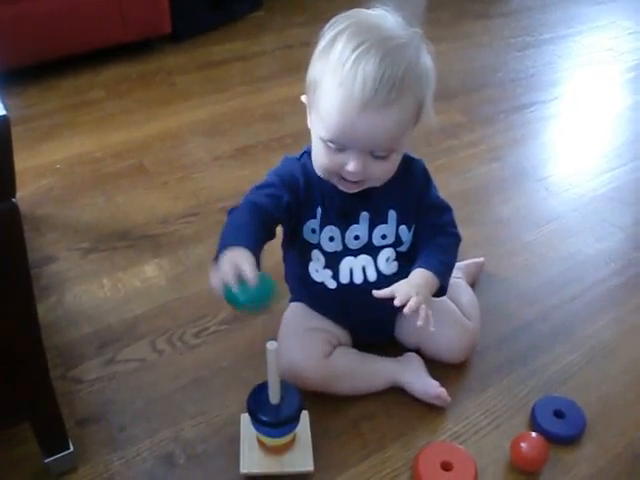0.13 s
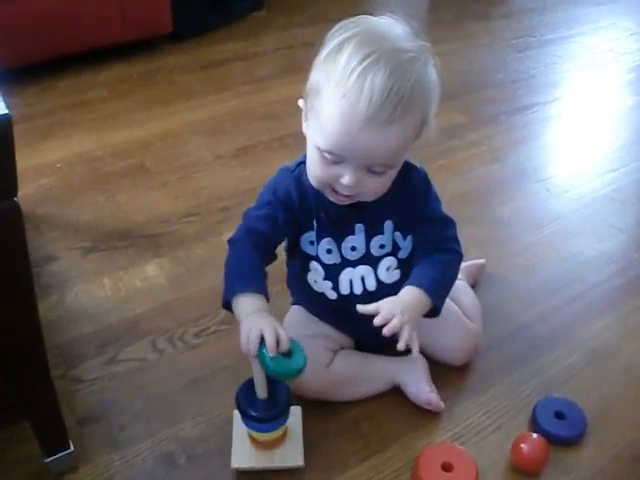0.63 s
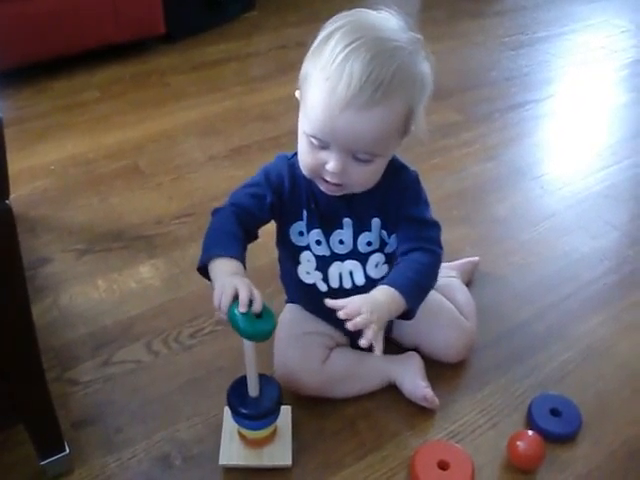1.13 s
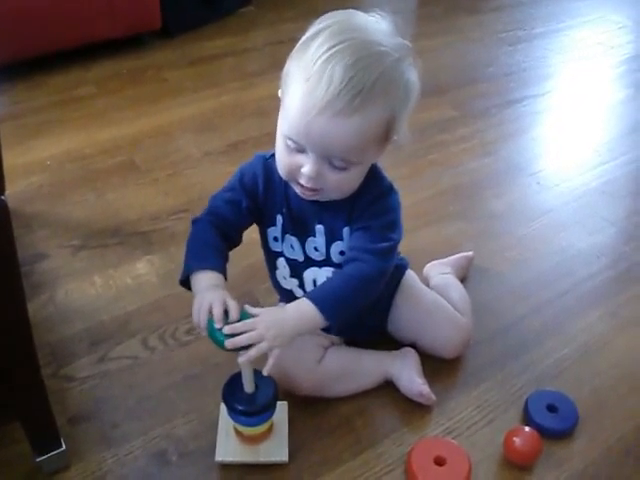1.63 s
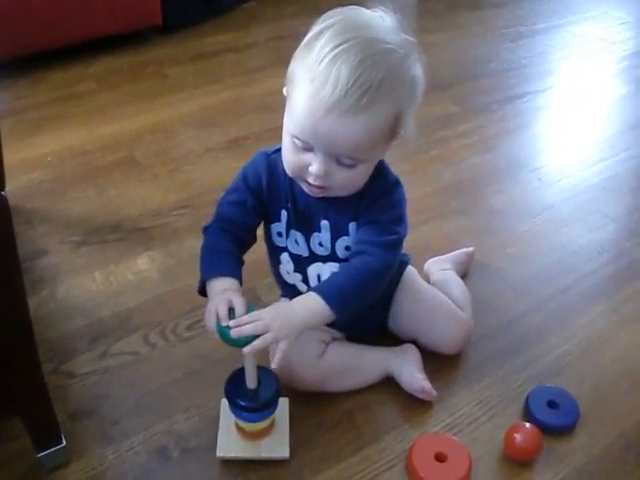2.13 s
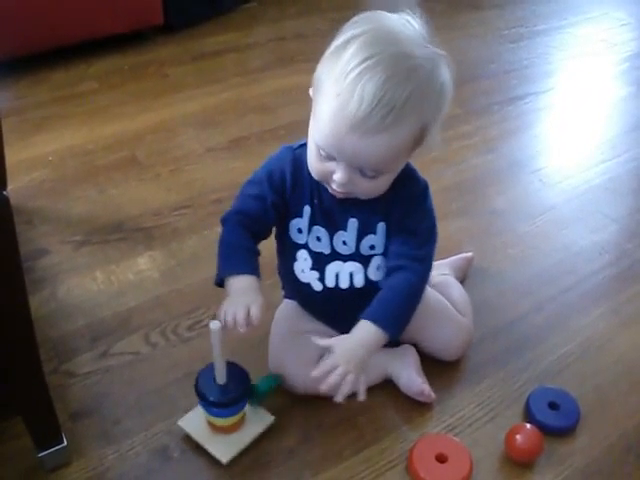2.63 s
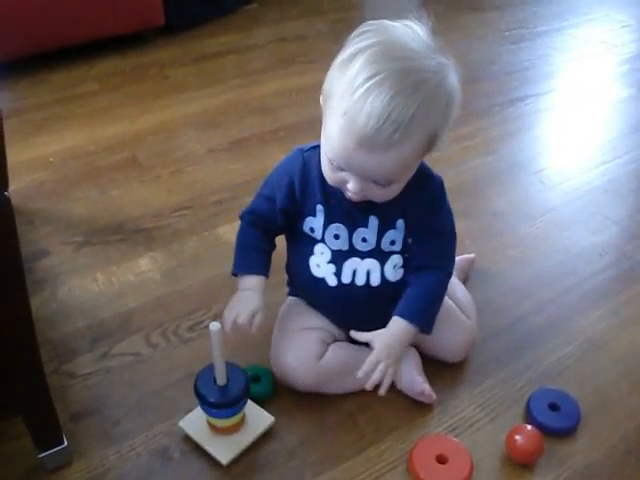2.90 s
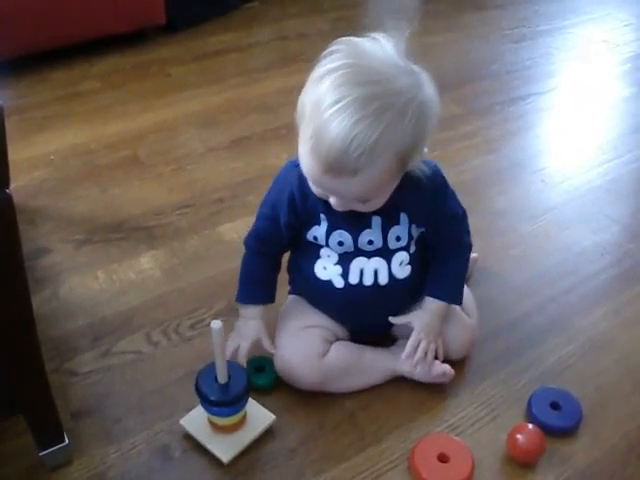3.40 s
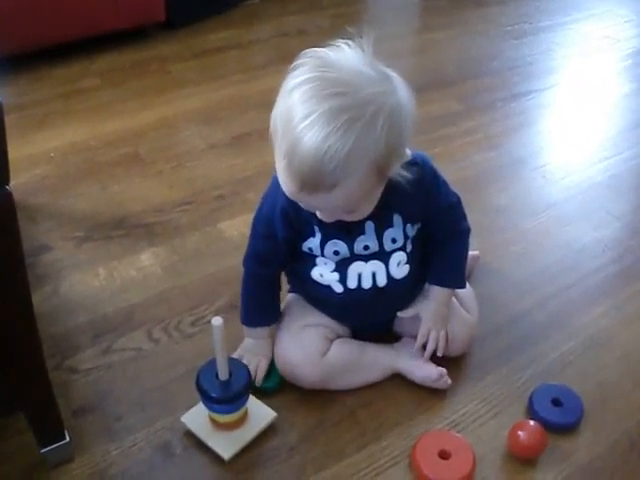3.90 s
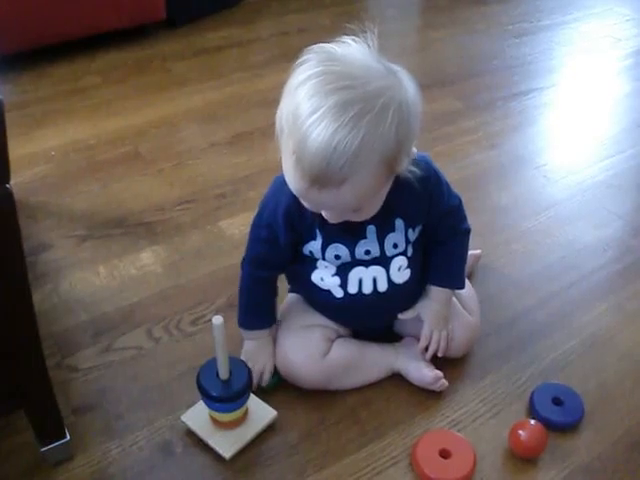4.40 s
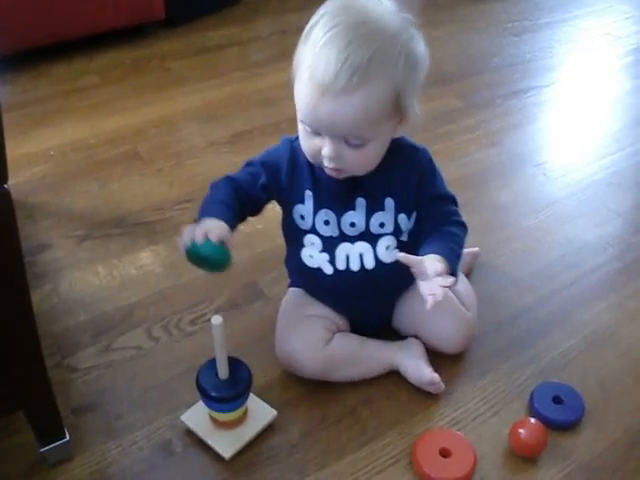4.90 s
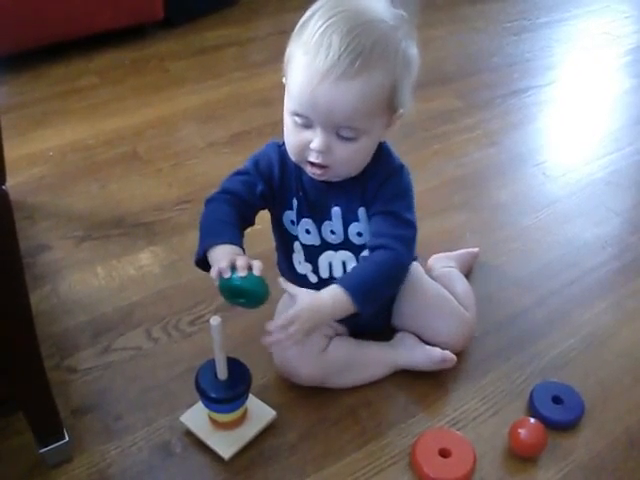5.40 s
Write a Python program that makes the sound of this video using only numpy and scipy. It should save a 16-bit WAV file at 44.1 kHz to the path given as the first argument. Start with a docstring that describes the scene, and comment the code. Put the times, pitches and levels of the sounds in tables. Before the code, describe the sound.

A wooden toy ring clatters sharply off a stacking peg, bounces and wobbles on a hard floor, then taps once more in a quiet room.

```python
"""A faint wavering hum, a thin whine and hiss run throughout: a small echoing room, one microphone.
A wooden toy ring is knocked against the peg of a stacking toy and scrapes off it: wooden parts ring as dying
sines, rubbing is a train of random slips. The ring drops on a hard board floor, bounces, wobbles on its rim
and settles, then is dragged, taps the floor faintly and lands once more. Wall echoes reach the microphone
5.5 to 19 ms behind the direct sound, with a short tail; the hardest blows overload it."""
import sys
import numpy as np
from scipy import signal
from scipy.io import wavfile
from scipy.ndimage import uniform_filter1d

SR = 44100
rng = np.random.default_rng(int(sys.argv[2]) if len(sys.argv) > 2 else 0)


def gain_from_db(level_db):
    """Convert decibel levels to linear amplitude factors (20 dB per decade)."""
    decades = np.asarray(level_db, float) / 20
    return 10 ** decades


def file_out(sig):
    """Save sig as 16-bit WAV at sys.argv[1]."""
    # one column per channel
    cols = np.atleast_2d(sig).T
    # limit, then scale
    lim = np.clip(cols, -1, 1)
    pcm = np.round(lim * 32767).astype(np.int16)
    wavfile.write(sys.argv[1], SR, pcm)


N = 243873

# Spectrum of the room and microphone noise: (frequency [Hz], relative density [dB per Hz])
HISS_SPECTRUM = [(12, -34.5), (25, -17), (64, -3), (120, -13.5), (250, -12), (500, -15), (1000, -18.5),
                 (1700, -20.5), (5960, -28), (8000, -33.5), (14400, -42), (15700, -45.5), (18100, -63.5),
                 (19500, -85)]
# Low hum: (time [s], frequency [Hz], level [dB], octave level [dB])
HUM = [(0, 97.5, -65, -60), (.25, 94.7, -62.5, -57.5), (.6, 93.7, -55.5, -71.5), (1.3, 94.5, -53.5, -58.5),
       (1.799, 94.7, -55, -82), (2.2, 95, -59, -71), (2.8, 94.24, -61, -84), (3.3, 92.9, -57, -61),
       (4, 91.76, -62.5, -66.5), (4.6, 91.7, -62, -65.5), (5.53, 90.1, -67, -77.5)]
# High whine: (frequency [Hz], level [dB])
WHINE = [(15488, -86.5)]
# A lower tone that rises: (time [s], frequency [Hz], level [dB])
DRONE = [(4.2, 73, -57.5), (4.599, 73.8, -64.5), (5.07, 77.6, -60.5), (5.53, 80.1, -65.5)]

# The base rocks against the floor: (time [s], level [dB])
THUDS = [(0.229, -26), (1.295, -29.5), (2.165, -34.5), (2.239, -27), (2.278, -15), (2.313, -15.5),
         (2.34, -15.5)]
# The ring meets the toy: (time [s], blow on the stacked rings [dB], peg relative to them [dB],
# favoured frequency [Hz], focus [dB per octave squared, below 0 counts as 0])
KNOCKS = [(1.295, -23, 6, 3302, 2.2), (2.158, -55, 12, 2000, -5), (2.237, -49, 10, 2555, -3),
          (2.248, -38, 11, 2520, -0.7), (2.27, -26, -13, 2500, 6), (2.276, -11, -3, 2900, 9),
          (2.281, -9.5, -7, 3300, 7), (2.295, 1.5, -22.5, 5800, 4), (2.295, -22, -26, 6200, 15.5),
          (2.304, -7, -39, 4330, 13), (2.313, -14, -11, 4000, 8), (2.339, 3.5, -27.5, 7000, 1),
          (2.340, 0.5, -14.5, 4340, -17.5), (2.379, -12.5, -27.5, 6050, 4), (2.489, -36, 8.5, 1993, 6.5),
          (2.4991, 7.5, -21, 3760, 10.5), (2.538, -26, 8, 7000, 5.5), (2.717, -1, -21, 3600, 22.5)]
# Wood rubs on wood as the ring leaves the peg: (time [s], level [dB])
SCRAPE = [(2.23, -49.5), (2.276, -15), (2.302, -20), (2.335, -33.5)]
# The ring lands on the floor: (time [s], blow [dB], boards relative to the ring [dB],
# favoured frequency [Hz], focus [dB per octave squared, below 0 counts as 0])
BOUNCES = [(2.661, 3, -15, 2050, 2.5), (2.773, 3, -20, 2390, -6.3), (2.843, 1.8, -24, 2270, 14.5),
           (2.876, 9.5, -48, 4550, 6), (3.101, 1.5, -17.5, 2200, 0), (3.143, -3, -11, 2200, 11.5),
           (3.172, -3.5, -21, 2200, 21), (3.741, -37.5, 0.5, 1820, 7), (4.532, -14.5, -10.5, 2223, -2.5),
           (4.5375, -26.5, 8.5, 1600, 5)]
# The tilted ring taps the floor with its rim: (time [s], level [dB])
RIM_TAPS = [(2.68, -15.5), (2.786, -16.5), (2.889, -2), (2.908, -16), (2.929, -13), (2.945, -9.5),
            (2.953, -19.5), (2.959, -7.5), (2.967, -8), (2.986, -16), (2.993, -14), (3, -20),
            (3.037, -26.5), (3.042, -2.5), (3.056, -18), (4.184, -45.5), (4.35, -42.5)]
# The ring rolls on its rim: (time [s], level [dB])
ROLL = [(2.87, -34), (3.014, -31.5), (3.03, -29.5), (3.041, -15), (3.05, -29.5), (3.075, -22)]
# The ring is dragged: (time [s], level [dB])
DRAG = [(3.69, -45), (3.735, -60.5), (3.745, -44.5), (3.79, -54), (3.81, -65)]

# Modes of the peg: (frequency [Hz], level [dB], t60 [s])
PEG_MODES = [(1579, -4.5, 0.08), (1652, 2.5, 0.05), (2626, -6, 0.072), (3050, -11.5, 0.024),
             (3900, -3, .02), (4000, -11, 0.048), (5600, -21, 0.011)]
# Modes of the stacked rings: (frequency [Hz], level [dB], t60 [s])
STACK_MODES = [(2340, -7, 0.0064), (2850, -9.5, 0.042), (2880, -2, 0.0063), (3240, -6, 0.0089),
               (3470, 2.5, 0.014), (3710, 2.5, .006), (4690, 0, 0.0089), (5410, -2.5, 0.0054),
               (5346, 0, 0.01), (5300, -11.5, 0.0024), (5777, -12.5, 0.0142), (6380, -11, 0.03),
               (7235, -10, 0.004), (7640, -9, 0.018), (8840, -34, 0.0028), (10200, -2.5, 0.0052),
               (12500, -19, 0.0046)]
# Modes of the toy's base: (frequency [Hz], level [dB], t60 [s])
BASE_MODES = [(213, -12, 0.054), (318, 6, 0.029), (396, -3.5, 0.043), (730, -46, 0.043), (1100, -37, 0.036)]
# Modes of the loose ring: (frequency [Hz], level [dB], t60 [s])
RING_MODES = [(1357, -27, 0.027), (1874, 0, 0.012), (2165, 7.5, 0.0062), (2640, -31, 0.041),
              (3440, 0, 0.0097), (4169, -10.5, 0.023), (4900, -8, 0.0076), (5800, -33.5, 0.023),
              (5770, -18.5, 0.012), (7000, -11, 0.009), (11300, -60, 0.0031)]
# Modes of the floor boards: (frequency [Hz], level [dB], t60 [s])
BOARD_MODES = [(297, 2, 0.037), (449, 4.6, 0.028), (554, -4.5, 0.016), (687, 0, .03), (758.6, -2, 0.032),
               (950, 4, .012), (1260, -25, .015), (1375, -4.5, .012)]

# Single wall echoes: (delay [s], level [dB])
ECHOES = [(.0055, -27.5), (0.0173, -24), (0.019, -40.5)]
# Decay of the room: (frequency [Hz], t60 [s])
ROOM_DECAY = [(200, 0.83), (500, 0.12), (1000, 0.58), (1800, 0.21), (4500, 0.59), (9000, 0.33),
              (15000, 0.31)]
# Colour of the room's tail: (frequency [Hz], relative level [dB])
ROOM_COLOUR = [(200, 0.5), (500, 6.5), (950, 9.5), (1400, 4), (2500, -0.5), (4000, -5.5), (8000, -3.5),
               (11000, -5), (15000, 0)]


def evened(x):
    """Scales to rms 1."""
    return x / np.sqrt(np.mean(x ** 2) + 1e-20)


def read(points, hz):
    """Reads a spectrum on a log-frequency axis."""
    f, value = np.transpose(points)
    return np.interp(np.log(hz + 1), np.log(f + 1), value)


def add(mix, s, sound):
    """Lays a sound into the mix at time s."""
    part = mix[round(s * SR):][:len(sound)]
    part += sound[:len(part)]


def hiss():
    """Steady room and microphone noise: shaped random spectra with faint drifting patches."""
    level_db, patch_db = -54, 0.454
    frames, hz = N // 256 + 5, np.fft.rfftfreq(1024, 1 / SR)
    real, imaginary, patches = rng.standard_normal((frames, 513, 3)).T
    patches = uniform_filter1d(patches, 12, 0)  # broad in frequency
    patches = evened(uniform_filter1d(patches, 14, 1))  # slow in time
    shape = gain_from_db(read(HISS_SPECTRUM, hz))
    spectra = (real + 1j * imaginary) * shape[:, None] * gain_from_db(patch_db * patches)
    noise = evened(signal.istft(spectra, nperseg=1024, noverlap=768)[1][:N])
    above = np.sqrt((shape[5:] ** 2).sum() / (shape ** 2).sum())  # the level is set above 200 Hz
    return gain_from_db(level_db) * noise / above


def gliding_tone(s, hz, db, multiple=1):
    """A sine whose pitch and rms level glide between points in time."""
    t = np.arange(N) / SR
    angle = 2 * np.pi * np.cumsum(np.interp(t, s, hz)) / SR
    return np.sqrt(2) * gain_from_db(np.interp(t, s, db)) * np.sin(multiple * angle)


def hum():
    """A wavering low hum with its octave locked to it."""
    s, hz, db, octave_db = np.transpose(HUM)
    return gliding_tone(s, hz, db) + gliding_tone(s, hz, octave_db, multiple=2)


def whine():
    """A thin, steady high sine."""
    t = np.arange(N) / SR
    return sum(np.sqrt(2) * gain_from_db(db) * np.sin(2 * np.pi * hz * t) for hz, db in WHINE)


def ringing(modes, centre_hz=2500, focus_db=0, lasting=1, loose=0.032, rise_s=0.00021):
    """Dying sines, favoured near one pitch; each blow draws slightly different mode pitches and levels."""
    hz, db, t60 = np.transpose(modes)[:, :, None]
    t = np.arange(SR // 5) / SR
    stray, uneven_db = rng.standard_normal((len(modes), 2, 1)).transpose(1, 0, 2)
    db = db - max(focus_db, 0) * np.log2(hz / centre_hz) ** 2 + uneven_db
    rise = 1 - np.exp(-(t / rise_s) ** 2)  # the contact builds up
    waves = np.sin(2 * np.pi * hz * (1 + loose * stray) * t)
    dying = gain_from_db(db - 60 * t / (t60 * lasting))
    return (dying * waves).sum(0) * rise / 2


def base_thuds():
    """The base rocks against the floor and its low modes ring."""
    out = np.zeros(N)
    for s, db in THUDS:
        add(out, s, gain_from_db(db) * ringing(BASE_MODES, rise_s=0.00056))
    return out


def room_tail():
    """Scattered taps that die band by band, with a few single wall echoes."""
    taps = np.zeros(SR)
    at = np.arange(150, SR - 20, 12)
    taps[at + rng.integers(0, 12, len(at))] = rng.choice([-1., 1.], len(at))
    hz, when, z = signal.stft(taps, SR, nperseg=128)
    z *= gain_from_db(read(ROOM_COLOUR, hz)[:, None] - 60 * when / read(ROOM_DECAY, hz)[:, None])
    tail = signal.istft(z, SR, nperseg=128)[1]
    tail *= gain_from_db(-6) / np.linalg.norm(tail)
    for s, db in ECHOES:
        tail[round(s * SR)] += gain_from_db(db)
    return tail


def room(x):
    """The room's echo: three tails take turns, so that successive blows echo differently."""
    out, t = np.zeros(N), np.arange(N) / SR
    for k in range(3):
        turn = np.cos(np.pi * (7 * t + k / 3)) ** 2 / np.sqrt(9 / 8)  # the three powers add to 1
        out += signal.fftconvolve(x * turn, room_tail())[:N]
    return out


def crack(level_db, centre_hz, blow_db):
    """The first instant of a blow: the contact itself sends out a short clack with splintery noise."""
    t = np.arange(SR // 5) / SR
    clack = np.sin(2 * np.pi * centre_hz * t) * (t / 0.00026) * np.exp(1 - t / 0.00039)
    splinter_db = -8 + 0.3 * blow_db - 60 * t / 0.005  # harder blows splinter more; t60 5 ms
    return gain_from_db(level_db) * (clack + gain_from_db(splinter_db) * rng.standard_normal(len(t)))


def knocks():
    """Knocks of the ring on the toy ring the stacked rings and the peg, and pass a little to the base."""
    out = np.zeros(N)
    for s, db, peg_db, hz, focus_db in KNOCKS:
        stack = ringing(STACK_MODES, hz, focus_db, loose=0.006)
        peg = gain_from_db(peg_db) * ringing(PEG_MODES, loose=0.0012)
        base = gain_from_db(-24.5) * ringing(BASE_MODES, rise_s=0.00091)
        contact = crack(-7 - 0.14 * max(focus_db, 0), hz, db)
        add(out, s, gain_from_db(db) * (stack + peg + base + contact))
    return out


def rubbing(rows, body, per_s, lumpy_db):
    """Tiny random slips of uneven size, each ringing the body."""
    s, db = np.transpose(rows)
    t = np.arange(s[0], s[-1], 1 / SR)
    luck, size, sign = rng.random((len(t), 3)).T
    slips = (luck < per_s / SR) * gain_from_db(-lumpy_db * np.log(size + 0.016)) * np.sign(sign - .5)
    slips = evened(slips) * gain_from_db(np.interp(t, s, db))
    slips *= signal.windows.tukey(len(t), .2)  # soft ends
    return s[0], signal.oaconvolve(slips, body / np.linalg.norm(body))


def peg_scrape():
    """The held ring scrapes over the peg tip; slips ring the peg, the stacked rings and the base."""
    out = np.zeros(N)
    body = ringing(PEG_MODES, lasting=0.2)  # a fifth of the peg's free ringing time
    body += gain_from_db(-5.0) * ringing(STACK_MODES, 3110, 6.7) + gain_from_db(-26.5) * ringing(BASE_MODES)
    add(out, *rubbing(SCRAPE, body, per_s=900, lumpy_db=2.8))
    return out


def floor_blows():
    """Bounces and rim taps ring the loose ring and, more slowly rising, the floor boards."""
    out = np.zeros(N)
    rim_boards_db, rim_hz, rim_focus_db = -34, 2200, 7
    taps = [(s, db, rim_boards_db, rim_hz, rim_focus_db) for s, db in RIM_TAPS]
    for s, db, boards_db, hz, focus_db in BOUNCES + taps:
        ring = ringing(RING_MODES, hz, focus_db, loose=0.0145)
        boards = gain_from_db(boards_db) * ringing(BOARD_MODES, loose=0.054, rise_s=0.0032)
        contact = crack(-10.0 - .5 * max(focus_db, 0), hz, db)
        add(out, s, gain_from_db(db) * (ring + boards + contact))
    return out


def floor_rubbing(rows, boards_db):
    """Slips between ring and floor ring both the ring and the boards."""
    out = np.zeros(N)
    boards = ringing(BOARD_MODES, 605, 27.0, lasting=0.47)
    body = ringing(RING_MODES) + gain_from_db(boards_db) * boards
    add(out, *rubbing(rows, body, per_s=600, lumpy_db=7.5))
    return out


def roll():
    """The ring rolls on its rim, with little of the boards in the sound."""
    return floor_rubbing(ROLL, boards_db=-11)


def drag():
    """The ring is dragged over the boards, which take a larger share of the sound than in the roll."""
    return floor_rubbing(DRAG, boards_db=5.5)


def drone():
    """A low tone that fades in late and rises in pitch."""
    s, hz, db = np.transpose(DRONE)
    fade_in = np.clip((np.arange(N) / SR - s[0]) / 0.11, 0, 1)
    return fade_in * gliding_tone(s, hz, db)


def scene():
    """The wood, too small to send out bass, its echo in the room, and the background."""
    background = hiss() + hum() + whine() + drone()
    wood = base_thuds() + knocks() + peg_scrape() + floor_blows() + roll() + drag()
    wood = signal.sosfilt(signal.butter(3, 185, "high", fs=SR, output="sos"), wood)
    # the microphone dulls the top treble of the blows
    wood = signal.sosfilt(signal.butter(2, 14500, fs=SR, output="sos"), wood)
    return (wood + room(wood) + background)[None]


def low_pass(x):
    """Removes everything above the highest recorded frequency."""
    return signal.sosfilt(signal.butter(12, 18250, fs=SR, output="sos"), x)


def record(dry):
    """Gain control turns down a little after loud blows and recovers slowly; the microphone clips peaks."""
    past_power = abs(uniform_filter1d(dry[0] ** 2, 2000, origin=999))  # mean of the last 45 ms
    power_db = 10 * np.log10(past_power + 1e-12)
    fall_db = np.arange(N) * 13.0 / SR  # the held level falls 13 dB a second
    held_db = np.maximum.accumulate(power_db + fall_db) - fall_db
    over_db = np.maximum(held_db + 37, 0)  # excess over -37 dB
    ducked = dry / gain_from_db(0.16 * uniform_filter1d(over_db, 400))
    return low_pass(np.clip(ducked, -1, 1))


dry = scene()
out = record(dry)
file_out(out)
```